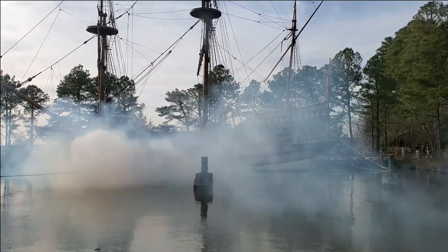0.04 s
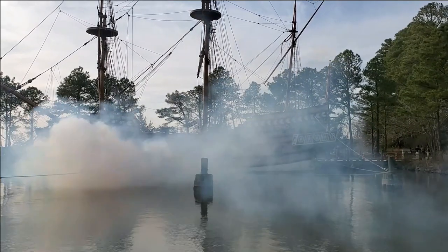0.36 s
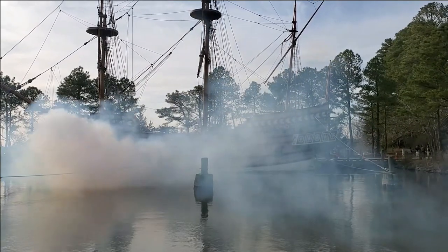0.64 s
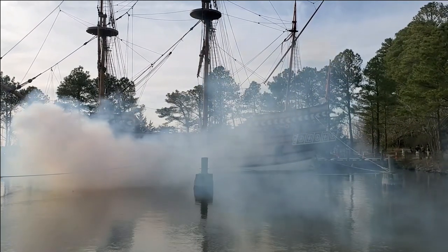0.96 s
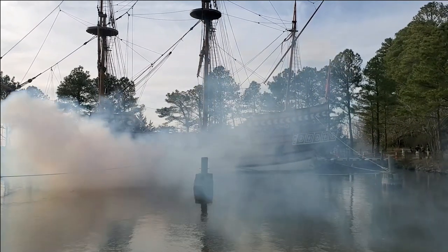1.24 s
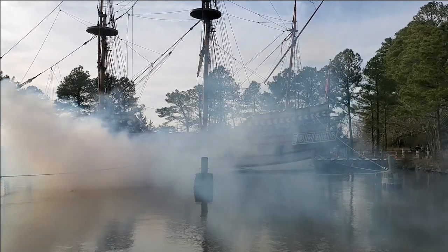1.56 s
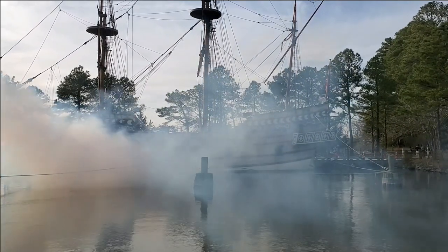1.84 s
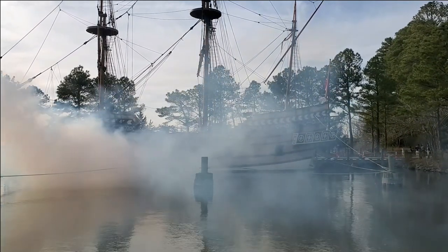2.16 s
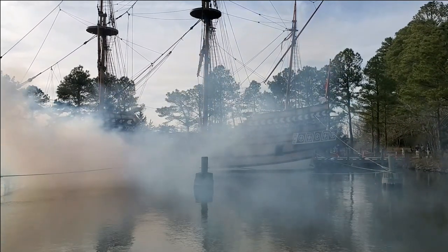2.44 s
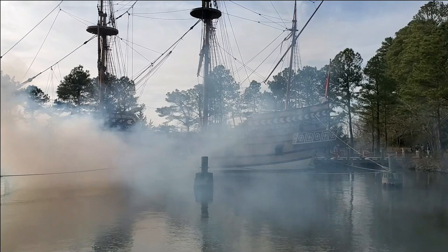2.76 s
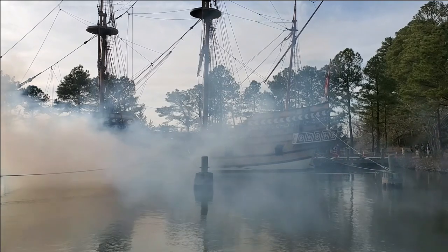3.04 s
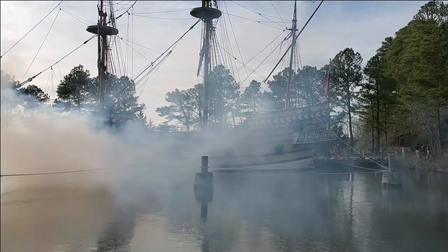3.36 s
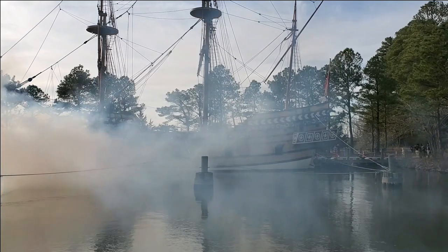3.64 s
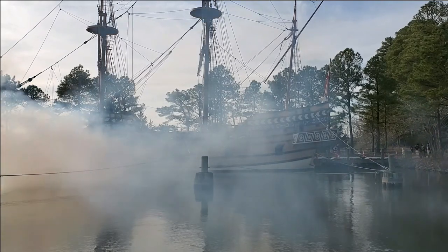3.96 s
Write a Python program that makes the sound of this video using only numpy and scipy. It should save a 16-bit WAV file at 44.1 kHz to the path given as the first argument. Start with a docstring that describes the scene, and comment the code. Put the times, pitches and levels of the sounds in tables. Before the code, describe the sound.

A cannon blast booms over open water right at the start, with a bright crash on top. Deep, thudding echoes roll back from wooded shores, strongest through the first second or so, then dull and fade to a low rumble by 4 seconds. Faint bird chirps begin around 1.5 seconds, with three soft falling whistles between 2.5 and 3 seconds, over a very faint hiss.

```python
"""A ship's cannon blast rolls back over open water from the wooded shores.
Near trees scatter a bright crash; later echoes have crossed more air and grow dull.
Below them runs a deep boom, with distinct thuds thrown back by single shores.
Birds call in gliding tones as the rumble fades, with a few small ticks and a faint hiss."""
import sys
import numpy as np
from scipy import signal
from scipy.fft import rfft, irfft, next_fast_len
from scipy.io import wavfile
from scipy.ndimage import uniform_filter1d, minimum_filter1d, map_coordinates

SR = 44100
rng = np.random.default_rng(int(sys.argv[2]) if len(sys.argv) > 2 else 0)


def unload_wav(signal):
    """Save mono or channel-first audio to the path in sys.argv[1] as 16-bit WAV at rate SR, clipped to [-1, 1]."""
    wavfile.write(
        sys.argv[1],
        SR,
        np.round(np.clip(np.atleast_2d(signal).T, -1, 1) * 32767).astype(np.int16),
    )


N = 176400


def amp(db):
    """Decibels to gain."""
    return 10 ** (np.asarray(db) / 20)


def unit(x):
    """Scale to rms 1."""
    return x / np.sqrt(np.mean(x ** 2) + 1e-20)


def along(points, hz):
    """Interpolate (frequency [Hz], value) points on a log axis."""
    knots_hz, values = np.transpose(points)
    return np.interp(np.log(hz + 1), np.log(knots_hz + 1), values)


def clock():
    """Sample times [s]."""
    return np.arange(N) / SR


def curves(rows):
    """One per-sample curve for each column after the time."""
    time_s, *columns = np.transpose(rows)
    return [np.interp(clock(), time_s, column) for column in columns]


def wobble(rate_hz):
    """Smooth random curve, rate_hz knots a second."""
    return map_coordinates(rng.standard_normal(N // 8), [clock() * rate_hz], mode="wrap")


def filtered(x, response):
    """Apply a complex frequency response."""
    size = next_fast_len(N + SR // 2)
    return irfft(rfft(x, size) * response(np.fft.rfftfreq(size, 1 / SR)), size)[..., :N]


def noise(spectrum):
    """Mono coloured noise, rms 1."""
    return unit(filtered(rng.standard_normal(N), lambda hz: amp(along(spectrum, hz))))


def sides(pan_db):
    """Stereo gains for a pan, left minus right."""
    return amp(np.array([[.5], [-.5]]) * pan_db)


def decay(start_s, t60_s):
    """Instant rise, exponential fall."""
    age_s = clock() - start_s
    return (age_s >= 0) * np.exp(-np.log(1000) * np.abs(age_s) / t60_s)


def hiss(left_db=-63.5, right_db=-72.5):
    """Faint hiss, louder on the left, rising slowly after the blast."""
    # spectrum per side (frequency [Hz], level [dB])
    left_spectrum = [(500, -0.5), (2800, -1.5), (3600, -12.5), (5700, -15), (6450, -6.5), (6950, -10),
                     (7500, -0.5), (8000, 3), (8500, -6.5), (9100, -26.5), (10500, -20), (12000, -7),
                     (13500, -10.5), (15500, -11.5)]
    right_spectrum = [(500, 0), (2800, -3.5), (4000, -5), (6000, -11), (7800, -13), (9000, -15.5),
                      (15500, -11)]
    # fade-in (time [s], gain [dB])
    rise = [(0, -11), (.8, -8.5), (1.35, -6), (1.9, -2.5), (3, -1), (4, 0)]
    rise_db, = curves(rise)
    left = amp(left_db) * noise(left_spectrum)
    right = amp(right_db) * noise(right_spectrum)
    return amp(rise_db) * np.array([left, right])


def ticks():
    """Small dry ticks: bright, fast-decaying noise."""
    # ticks (time [s], level [dB], t60 [s], pan [dB])
    events = [(.8323, -34.5, .003, 1), (.968, -68, .12, 5), (1.773, -52, .075, -8)]
    # tick colour (frequency [Hz], level [dB])
    spectrum = [(1500, -16), (4000, 1), (6500, 1), (9500, -2), (15000, 2)]
    return sum(sides(pan_db) * amp(db) * decay(start_s, t60_s) * [noise(spectrum), noise(spectrum)]
               for start_s, db, t60_s, pan_db in events)


def birds(wood_t60_s=.5, wood_db=-14):
    """Pure gliding notes that ring briefly among the trees."""
    # falling whistles, soft chirps (time [s], length [s], start [Hz], end [Hz], level [dB], pan [dB])
    whistles = [(2.558, 0.065, 2970, 2630, -56, -10), (2.792, .078, 2960, 2600, -53.5, -11.5),
                (3.031, 0.073, 2970, 2646, -49.5, -9.5)]
    chirps = [(1.466, .045, 4100, 4650, -73, -9), (1.51, 0.059, 3850, 4380, -69, 2),
              (1.555, 0.06, 4040, 4300, -69, 1.5), (1.559, .04, 3450, 3680, -63.5, 1),
              (1.643, 0.033, 3420, 3590, -59, -2), (1.767, 0.021, 3705, 3710, -57.5, 1.5),
              (2.537, 0.025, 3170, 3000, -66.5, -7), (2.646, .036, 2350, 2300, -62, 5),
              (2.892, 0.037, 2280, 2280, -69.5, 3), (3.145, 0.043, 2270, 2230, -65, -1.5)]
    song = np.zeros((2, N))
    for start_s, length_s, start_hz, end_hz, db, pan_db in whistles + chirps:
        progress = np.clip((clock() - start_s) / length_s, 0, 1)
        phase = 2 * np.pi * np.cumsum(start_hz + (end_hz - start_hz) * progress) / SR
        envelope = np.abs(np.sin(np.pi * progress)) ** 1.2
        song += sides(pan_db) * amp(db) * envelope * np.sin(phase)
    tail = (rng.standard_normal((2, N)) * decay(0, wood_t60_s))[:, :SR]
    tail /= np.linalg.norm(tail[0])
    reverb = signal.fftconvolve(song.mean(0)[None], tail, axes=1)[:, :N]
    return song + amp(wood_db) * reverb


def scatter(spectrum):
    """Countless overlapping echoes: stereo noise, rms 1, narrow in the bass, wide in the treble."""
    # likeness of the ears (frequency [Hz], coherence [ratio])
    coherence = [(60, .965), (170, .93), (350, .8), (650, .46), (1000, .42), (1500, .33), (2800, .06),
                 (8000, .03)]
    # left lead (frequency [Hz], phase [rad])
    lead = [(60, -.12), (200, -.12), (370, -.27), (650, -1), (1000, -2.3), (1500, -3.4), (3000, -6)]
    # balance (frequency [Hz], pan [dB])
    tilt = [(100, .3), (400, -.4), (1100, -2), (2400, -1.7), (8000, -2.4)]

    def spread(hz):
        width_rad = np.arccos(np.clip(along(coherence, hz), -1, 1)) / 2
        return amp(along(spectrum, hz)) * [np.cos(width_rad), np.sin(width_rad)]

    def place(hz):
        return sides(along(tilt, hz)) * np.exp(1j * np.array([[.5], [-.5]]) * along(lead, hz))

    mid, side = filtered(rng.standard_normal((2, N)), spread)
    return unit(filtered(np.array([mid + side, mid - side]), place))


def through_air(x, onset_s=0.086):
    """The later an echo arrives, the more treble the air has absorbed."""
    # air absorption (frequency [Hz], loss [dB/s])
    absorption = [(200, .2), (1000, 2.2), (2000, 6), (3000, 15.5), (4000, 27), (5500, 45), (8000, 56),
                  (11000, 67), (16000, 74)]
    hz, time_s, frames = signal.stft(x, SR, nperseg=512)
    loss_db = along(absorption, hz)[:, None] * np.maximum(time_s - onset_s, 0)
    return signal.istft(frames * amp(-loss_db), SR, nperseg=512)[1][:, :N]


def rush(gain_db=1):
    """Bright upper band of the echo, dulled by the air, then levelled to follow its envelope."""
    # envelope (time [s], level [dB])
    envelope = [(0.0, -23.5), (0.13, -21.5), (0.19, -24), (0.2, -23.5), (0.23, -23), (0.51, -27),
                (0.54, -30.5), (0.66, -29), (0.69, -27), (0.7, -28.5), (1.71, -39.5), (2.12, -50),
                (2.65, -52), (3.05, -62), (3.73, -63.5), (4.0, -63.5)]
    # colour before air loss (frequency [Hz], level [dB])
    spectrum = [(450, -39), (750, -17.5), (1000, 1.5), (1350, 6), (2000, 0), (3100, -1.5), (4200, -4),
                (5500, -10), (7500, -14), (9500, -21), (15500, -20)]
    level_db, = curves(envelope)
    dulled = through_air(scatter(spectrum))
    power = np.abs(uniform_filter1d(np.mean(dulled ** 2, 0), size=8000))
    return amp(level_db + gain_db) * dulled / np.sqrt(power + 1e-12)


def slaps(t60_s=.08):
    """Sharp reflections from banks and walls."""
    # arrivals (time [s], level [dB])
    arrivals = [(0.099, -17), (0.151, -18), (0.194, -13.5), (0.295, -15), (0.689, -28.5), (1.163, -30),
                (2.755, -41), (3.597, -45), (3.83, -49.5)]
    # slap colour (frequency [Hz], level [dB])
    spectrum = [(100, -10.5), (250, -2.5), (700, -0.5), (2500, -4.5), (5000, -19.5), (15000, -33.5)]
    return sum(amp(db) * decay(start_s, t60_s) for start_s, db in arrivals) * scatter(spectrum)


def crash(level_db=-27.5, hold_s=0.076, fall_db_per_s=35, crackle_db=4, crackle_hz=700):
    """Near trees return the blast as a bright crackling burst."""
    # crash colour (frequency [Hz], level [dB])
    spectrum = [(150, -34), (400, -4.5), (1300, 1), (3300, 2.5), (5500, -15), (7500, -14), (9500, -23.5),
                (15500, -22)]
    envelope = amp(level_db - fall_db_per_s * np.maximum(clock() - hold_s, 0))
    return envelope * unit(scatter(spectrum) * amp(crackle_db * wobble(crackle_hz)))


def forest_echo(rumble_gain_db=-1, grain_db=0.7, grain_hz=260):
    """Trunks and banks scatter the blast: a rumble under a grainy roar, rush, crash and slaps."""
    # rolling envelopes (time [s], rumble level [dB], roar level [dB])
    roll = [(0.0, -20, -18), (0.03, -25, -25), (0.19, -18, -20), (0.26, -23, -18.5), (0.28, -27, -26),
            (0.3, -9.5, -17.5), (0.32, -16.5, -23), (0.48, -20, -25.5), (0.52, -25, -24.5),
            (0.58, -21.5, -29), (0.81, -23.5, -24), (0.83, -21, -27), (1.24, -30, -30), (1.4, -25.5, -29.5),
            (1.45, -26.5, -30), (2.12, -32.5, -38.5), (2.18, -33.5, -36), (2.43, -29.5, -40.5),
            (2.46, -33, -39), (3.56, -50, -53), (3.61, -38, -47), (3.68, -46.5, -54.5),
            (3.85, -44.5, -47.5), (4.0, -46, -53)]
    # low and middle bands (frequency [Hz], level [dB])
    rumble_spectrum = [(60, -25), (100, -1), (135, 0), (175, -5), (250, -8), (340, -18), (600, -45),
                       (1500, -100)]
    roar_spectrum = [(100, -30), (220, -9), (310, 0), (440, 0), (560, -3), (690, -2), (850, -6),
                     (1150, -20), (2000, -55), (4000, -110)]
    rumble_db, roar_db = curves(roll)
    rumble = amp(rumble_db + rumble_gain_db + 1.1 * wobble(rate_hz=30)) * scatter(rumble_spectrum)
    roar = amp(roar_db + 0.81 * wobble(rate_hz=22)) * scatter(roar_spectrum)
    upper = roar + rush() + through_air(crash() + slaps())
    return rumble + upper * amp(grain_db * wobble(grain_hz))


def thuds(pitch_hz=70, gain_db=0.5, skew=.2, sag=.06, spread=.1):
    """Single-shore echoes: fast rise, slower fall, sagging pitch. Returns sound and 0-1 envelope."""
    # shore echoes (crest time [s], level [dB], Gaussian width [s])
    arrivals = [(0.06, -6, .012), (0.164, -4, 0.015), (0.248, -6.5, 0.017), (0.302, -2, 0.011),
                (0.375, -7.5, 0.029), (0.502, -2, 0.0094), (0.531, -1.5, 0.014), (0.696, -5.5, 0.023),
                (0.844, -6, 0.021), (0.918, 0, 0.015), (0.988, -7, 0.0075), (1.061, -5.5, 0.026),
                (1.145, -5, 0.017), (1.262, -8, 0.027), (1.362, -7.5, .015), (1.494, -12, 0.026),
                (1.587, -7, 0.012), (1.714, -4.5, .015), (1.954, -10.5, 0.01), (2.13, -13.5, 0.023),
                (2.195, -6.5, 0.006), (2.322, -8.5, 0.01), (2.681, -15.5, 0.014), (3.021, -18.5, 0.016),
                (3.153, -25.5, 0.012), (3.414, -20, 0.0125), (3.655, -23, 0.0057), (3.896, -29, 0.017)]
    sound, presence = np.zeros(N), np.zeros(N)
    for crest_s, db, width_s in arrivals:
        half_turns, detune = rng.uniform(-0.96, 1, 2)
        offset_s = clock() - crest_s
        widths = offset_s / width_s
        envelope = np.exp(-.5 * (widths / (1 + skew * np.sign(widths))) ** 2)
        hz = pitch_hz * (1 + spread * detune - sag * np.tanh(widths))
        sound += amp(db + gain_db) * envelope * np.sin(2 * np.pi * hz * offset_s + np.pi * half_turns)
        presence = np.maximum(presence, envelope)
    return sound, presence


def cannon_boom(gain_db=0.5, evenness=0.42, duck=0.61):
    """The deep body of the blast rolls on, dipping under each shore's thud."""
    # envelope between thuds (time [s], level [dB])
    envelope = [(0, -14.5), (.12, -25), (.3, -13), (.5, -10.5), (.6, -12.5), (.78, -14), (.9, -8),
                (1.1, -15), (1.4, -17), (1.65, -19.5), (1.79, -25), (1.92, -20), (2.25, -22.5),
                (2.45, -24.5), (2.78, -34.5), (3.2, -31.5), (3.55, -36.5), (4, -36.5)]
    # boom colour (frequency [Hz], level [dB])
    spectrum = [(20, -25), (30, -18), (40, -5), (52, -2.5), (66, -.5), (82, .5), (97, -6), (120, -21),
                (200, -50), (400, -90)]
    level_db, = curves(envelope)
    body = scatter(spectrum)
    swell = uniform_filter1d(np.abs(signal.hilbert(body.mean(0))), size=700)
    body = unit(body / (swell + .1) ** evenness)  # partly flatten random swells
    shore_thuds, presence = thuds()
    return amp(level_db + gain_db) * body * np.sqrt(1 - duck * presence) + shore_thuds


def scene():
    """Everything heard from the bank."""
    return cannon_boom() + forest_echo() + birds() + ticks() + hiss()


def record(dry, top_hz=15850):
    """Peak limiter at full scale, then a brick-wall low-pass."""
    max_gain = 1 / np.maximum(np.abs(dry).max(0), 1)
    gain = uniform_filter1d(minimum_filter1d(max_gain, size=800), size=800)
    return filtered(dry * gain, lambda hz: hz < top_hz)


dry = scene()
out = record(dry)
unload_wav(out)
```